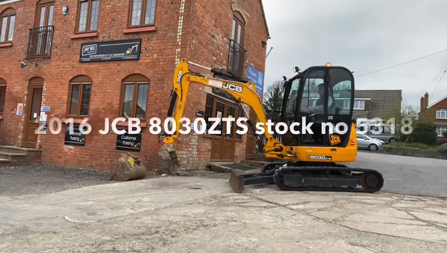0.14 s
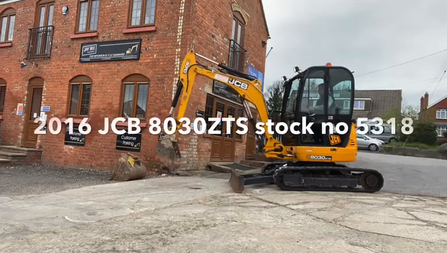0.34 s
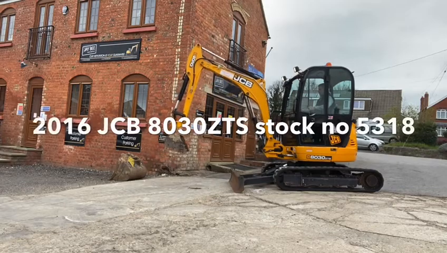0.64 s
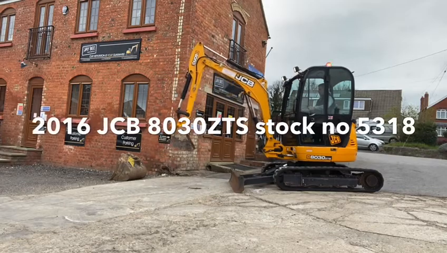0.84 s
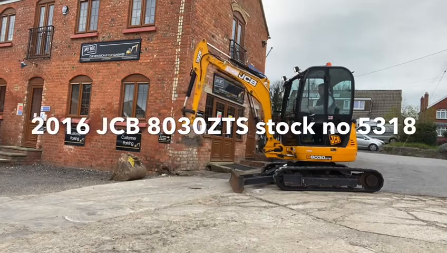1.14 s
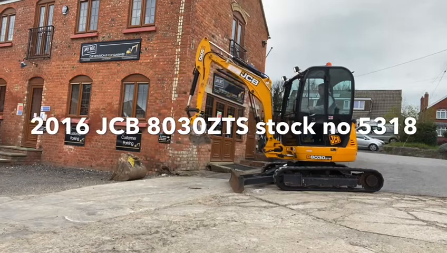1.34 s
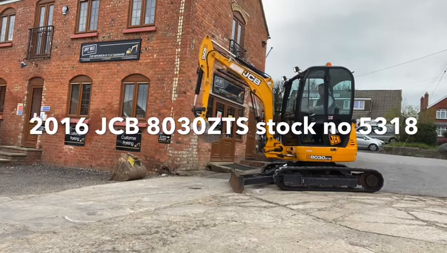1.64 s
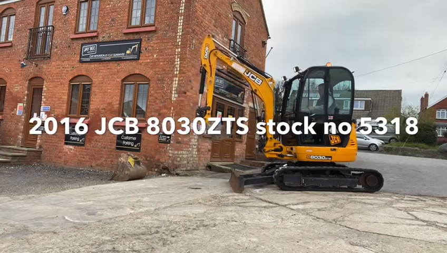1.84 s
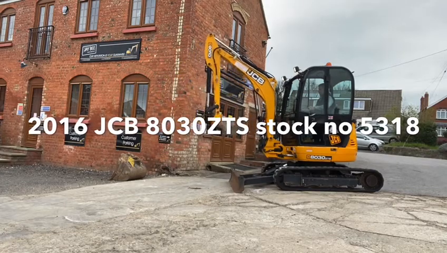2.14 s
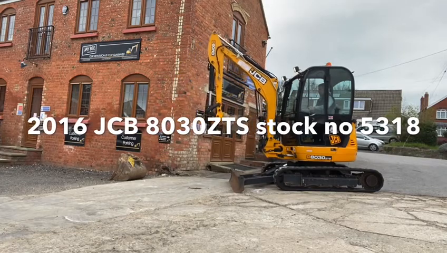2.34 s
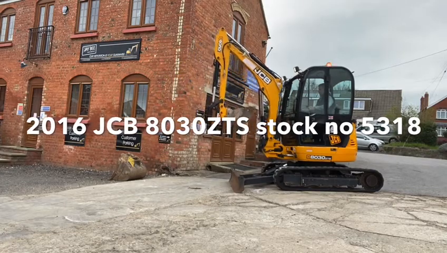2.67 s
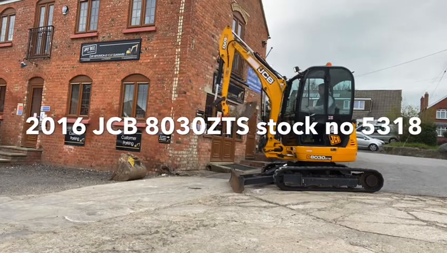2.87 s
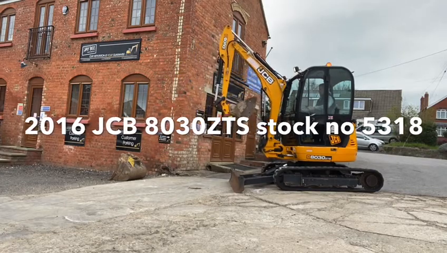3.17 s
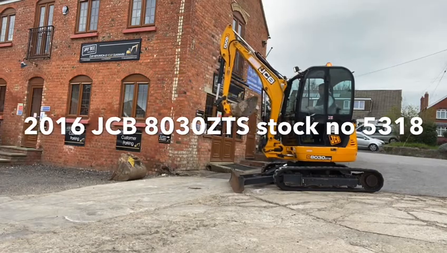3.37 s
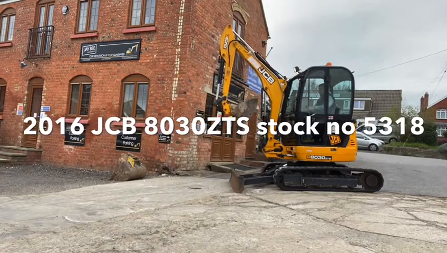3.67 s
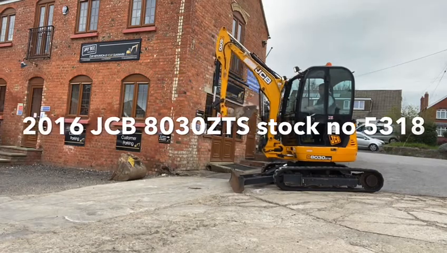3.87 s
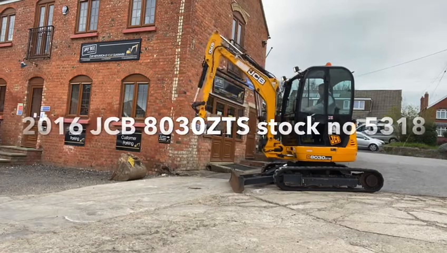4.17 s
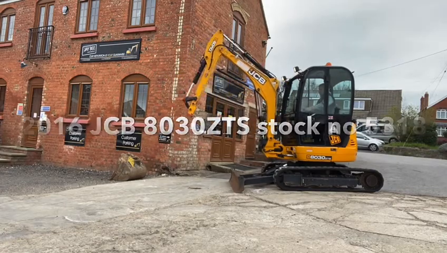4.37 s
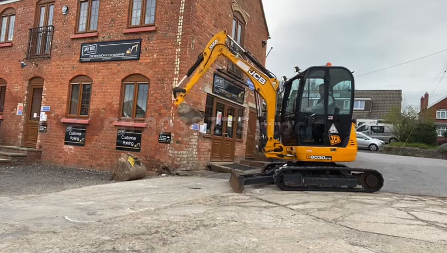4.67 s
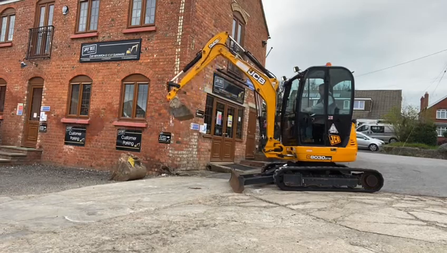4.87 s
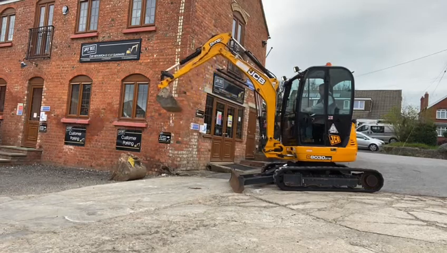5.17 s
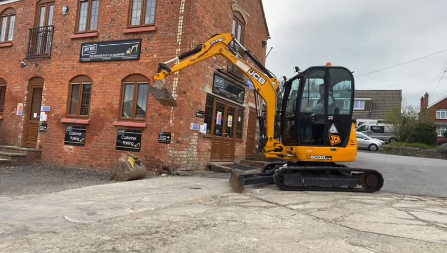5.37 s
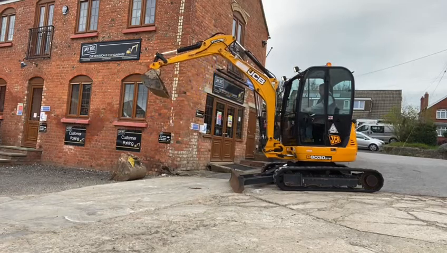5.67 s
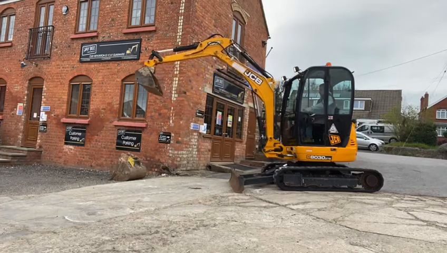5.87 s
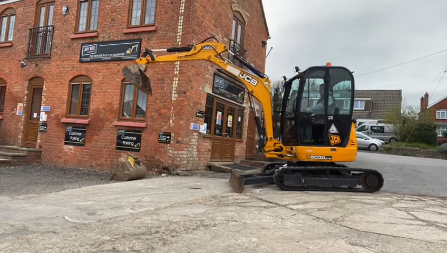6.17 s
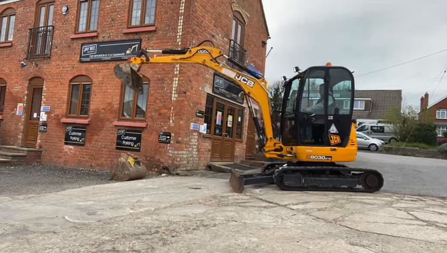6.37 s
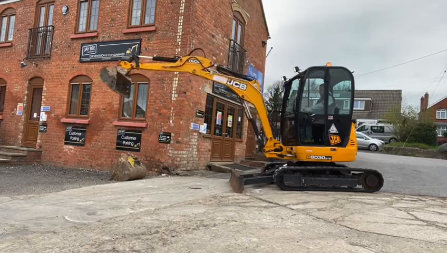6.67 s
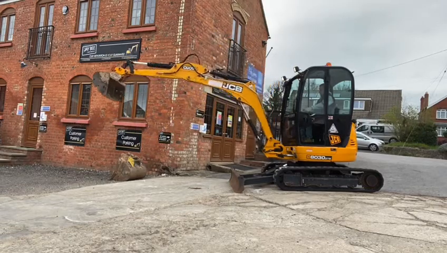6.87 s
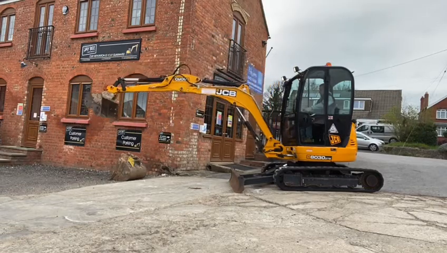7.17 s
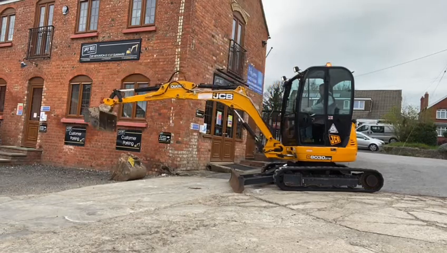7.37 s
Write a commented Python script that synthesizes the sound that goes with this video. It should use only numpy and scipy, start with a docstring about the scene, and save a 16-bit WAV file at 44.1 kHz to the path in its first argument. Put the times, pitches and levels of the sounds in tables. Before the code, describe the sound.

Close outdoor stereo sound of a compact digger working its arm in a paved yard. The low diesel drone never stops, dipping briefly under load, with gritty combustion clatter and thin whines. Steel joints knock softly at first, sharply a little later, then a breathy burst and one heavy thud with a bright crack. A few loose clanks trail off, and the engine continues with light ticks and faint hiss.

```python
"""In a paved yard beside a brick wall, a three-cylinder diesel mini excavator runs at a nearly steady speed.
The exhaust throbs as harmonics of the firing rate and barks through pipe resonances; the pump hums at the 8th.
Rumble, combustion clatter and oil hiss are coloured noises that swell with each firing.
The bucket linkage knocks as decaying modes and clanks when boom and arm change direction.
Thin whines are wavering sines; bursts of bright noise make a puff, then the crack of the big knock."""
import sys
import numpy as np
from scipy import signal
from scipy.fft import rfft, irfft
from scipy.io import wavfile
from scipy.ndimage import uniform_filter1d

SR = 44100
rng = np.random.default_rng(int(sys.argv[2]) if len(sys.argv) > 2 else 0)


def master(y):
    """Save y as 16-bit WAV."""
    cut = np.clip(np.atleast_2d(y).T, -1, 1)
    pcm = np.round(cut * 32767)  # scale
    wavfile.write(sys.argv[1], SR, pcm.astype(np.int16))


N = 331632

# Engine course; the firing tone rises with load:
# (time [s], firing rate [Hz], firing tone level [dB rms], second harmonic level [dB rms])
ENGINE = [(.0, 48.13, -21.5, -26), (.27, 47.23, -25, -23), (.45, 48.88, -24.5, -23),
          (.7, 49.43, -28, -26.5), (1.0, 48.57, -26, -26.5), (2.0, 48.52, -26, -26.5),
          (2.22, 48.19, -24, -22.5), (2.42, 45.65, -31, -48), (2.55, 47.16, -20.5, -24.5),
          (2.68, 48.58, -25.5, -20.5), (2.98, 47.27, -27, -22.5), (3.2, 49.7, -25, -25),
          (3.54, 50.6, -30, -22), (3.78, 49.65, -33, -24.5), (3.92, 49.9, -27, -23.5),
          (4.08, 47.52, -26, -26.5), (4.22, 49.9, -36, -24), (4.4, 48.78, -31.5, -25),
          (4.67, 48.95, -27, -26), (5.76, 48.12, -26.5, -23), (6.1, 48.07, -26.5, -23.5),
          (6.92, 46.95, -25.5, -22), (7.12, 48.83, -23.5, -22), (7.52, 48.5, -26, -27.5)]
# Higher harmonics of firing: (multiple [1], level at mean load [dB rms], share of load swing [1], waver [dB])
HARMONICS = [(3, -24, 0.37, 0.14), (4, -30, 0.64, 0.8), (5, -44, 0.25, 1.5), (7, -42, 0.33, 1.5),
             (12, -47, 0.27, 2.5)]
# Pump hum at the 8th multiple of the firing rate: (time [s], level [dB rms])
PUMP_HUM = [(0, -28.5), (.5, -33.5), (1.2, -33), (2.2, -31.5), (2.5, -31.5), (3.1, -31.5), (3.3, -41.5),
            (4.3, -36.5), (4.5, -34.5), (6.0, -30.5), (6.95, -30.5), (7.1, -33.5), (7.52, -32.5)]
# Weaker engine orders, most from unequal cylinders: (multiple of full cycle [1], level [dB rms])
UNEVEN_ORDERS = [(4, -46), (4.5, -42), (5, -43), (8, -40), (10, -36), (11, -44), (13, -37.5), (13.5, -44),
                 (14, -40.5), (15.5, -47), (16, -49), (17, -47), (18, -45), (19, -50), (20, -41.5),
                 (22, -46), (23, -46), (25, -53), (26, -53), (27, -43.5), (28, -49), (29, -53), (30, -55),
                 (33, -50), (34, -49), (37, -56), (39, -55), (40, -54), (45, -55), (48, -57), (50, -54)]
# Exhaust pipe resonances, before band limiting: (frequency [Hz], level [dB], t60 [s])
PIPE_MODES = [(220, -28.5, 0.06), (334, -40, 0.048)]
BARK_SPREAD_DB, BARK_JITTER_S = 5.5, 0.0008
# Colour of the engine body's rumble: (frequency [Hz], relative level [dB])
RUMBLE_COLOUR = [(25, -36), (60, 2.5), (130, 0), (220, 2), (300, -1), (420, -1.5), (520, -1.5), (650, -8.5),
                 (800, -7.5), (1100, -42)]
RUMBLE_DB, RUMBLE_DB_PER_HZ_SAG = -32, 0.94  # rumble grows as the engine is pulled below its mean speed
# Colour of the combustion clatter: (frequency [Hz], relative level [dB])
CLATTER_COLOUR = [(500, 7.5), (800, 5.5), (1200, 6), (1700, 2), (2500, 0.5), (3400, -3.5), (4100, 1),
                  (4700, -12), (6000, -11.5), (7000, -14), (8000, -12), (9300, -15), (10200, -16),
                  (11300, -21), (12200, -34)]
CLATTER_DB, CLATTER_LOAD_SHARE = -35, 0.26  # level at mean load; share of the load swing
# Knocks in the linkage:
# (time [s], strength [dB], centre of the modes struck [Hz], spread of the modes [octaves],
#  clank above ring [dB], free ringing [s])
KNOCKS = [(.32, -21, 378, 0.43, 0.5, 0.028), (.345, -28, 607, 0.88, 14, 0.057),
          (.365, -20, 490, 0.6, 11.5, 0.033), (.39, -25.5, 2090, 0.074, -15, 0.071),
          (.406, -20.5, 420.5, 0.39, 5, 0.028), (2.197, -22.5, 1469, 0.67, 17.5, 0.01),
          (2.205, -24, 431, 0.33, 5.5, 0.068), (2.233, -9, 740, 0.26, -2.5, 0.069),
          (2.24, -22, 440, 0.28, -9.5, 0.066), (2.236, -14, 2432, 0.5, 11, 0.08),
          (2.252, -11.5, 865, 0.36, 9.5, 0.042), (2.313, -11.5, 730, 0.71, 9.5, 0.056),
          (2.313, -18.5, 2780, 1.088, 10, .04), (2.318, -15, 430.5, .25, -7, 0.045),
          (2.32, -5.5, 207.3, 0.65, -15, 0.038), (2.335, -16.5, 1060, 0.13, -11, 0.19),
          (2.344, -14, 1960, 0.14, 1.5, 0.084), (2.378, -10.5, 890, 0.14, 3, 0.036),
          (2.41, -24.5, 1150, .5, 8, .07), (3.171, -30, 474.4, 1.6, -4, .05),
          (3.925, -28, 694, 0.29, 21.5, 0.052), (4.019, -19.5, 586, 0.4, 12, 0.063),
          (4.079, -10.5, 724, 0.21, 7, 0.016), (4.095, -7, 753, 0.3, 13.5, 0.1),
          (4.104, -18.5, 1791, 1.5, 7, 0.045), (4.107, -14, 6440, 1, -21, 0.059),
          (4.109, 3.5, 200, .3, -28, 0.014), (4.108, -4.5, 4900, .1, -20, 0.03),
          (4.172, -24, 5330, .1, -26, .02), (4.11, -6.5, 423, 0.12, -23.5, 0.1),
          (4.125, -26, 1300, 0.88, 12, 0.056), (4.215, -20, 775, 0.34, 8.5, 0.088),
          (4.325, -22.5, 850, 0.38, 8.5, 0.056), (4.346, -22.5, 860, 0.48, 13, 0.044),
          (4.38, -21, 737, 0.42, 10, 0.063), (4.4, -25, 2200, 0.098, -8, .03),
          (4.422, -15, 925, 0.055, 8, 0.095), (4.43, -36, 2143, .1, -4, .03),
          (4.447, -24, 1130, 0.14, 2, .05), (6.808, -25.5, 690, 0.24, 6.5, 0.027),
          (6.825, -26, 764, 0.1, 16.5, 0.022), (6.947, -15, 705, 0.095, 3, 0.014),
          (6.958, -17, 777, 0.14, 1, .035), (7.143, -21.5, 779.6, 0.13, 1, 0.026)]
# Modes of bucket and arm: (frequency [Hz], relative level [dB], undamped t60 [s])
STEEL_MODES = [(205, 0, .1), (380, -9, .12), (411, 1, 1.1), (462, -7, .18), (600, -8, .12), (707, -1, .5),
               (735, -3, .4), (785, -6, .2), (872, -3, .28), (918, -3, .35), (1044, -4, .9),
               (1125, -7, .25), (1207, -7, .25), (1324, -7, .25), (1430, -7, .25), (1620, -11, .15),
               (1809, -9, .25), (1868, -9, .22), (2146, -6, .3), (2229, -10, .2), (2476, -11, .2),
               (2665, -9, .25), (3100, -13, .15), (3800, -13, .12), (4097, -15, .12), (4900, -9, .12),
               (5383, -14, .2), (7833, -12, .12), (8161, -10, .1), (11100, -10, .1)]
MODE_SHARE_DB, CLANK_SHARE_DB = -5, -17  # what one mode and the clank take of a knock's strength
STRIKE_S, DAMPED_S, LINGER_DB = .008, .014, -13  # build-up; damping time constant; undamped remainder
RATTLE_DB, RATTLE_HZ = 2.0, 40  # loose parts make each mode flutter
# Colour of the clank: (frequency [Hz], relative level [dB])
CLANK_COLOUR = [(200, 10), (600, 9.0), (1000, 4.5), (2000, -6.0), (3500, -12.5), (4500, -10.0),
                (6000, -31.5), (12000, -14.0)]
# Oil valve openings: (opens fully [s], starts to shut [s], hiss level [dB])
VALVES = [(-.2, 0.092, -41), (2.487, 2.878, -36.5), (2.914, 3.24, -43.5), (6.09, 7.104, -45.5)]
OPEN_S, SHUT_S = 0.26, 0.035  # rise before full opening; closing time constant
# Colour of the oil hiss: (frequency [Hz], relative level [dB])
HISS_COLOUR = [(1500, -25), (2500, -7), (4200, 13), (5500, 12), (7500, 5.5), (9000, 9), (10300, -21.5),
               (11500, 32), (12200, -15)]
# Bursts of bright noise, a puff, then the crack of the big knock:
# (time [s], rise [s], hold [s], fall [s], level [dB])
BURSTS = [(3.863, 0.041, 0.018, 0.17, -30.5), (4.098, 0.0089, 0.004, 0.058, -46)]
# Colour of the bursts: (frequency [Hz], relative level [dB])
BURST_COLOUR = [(1200, 7.5), (2000, 22.5), (2800, 17), (4000, 11.5), (7000, 8.5), (12000, -28)]
# Thin whines of gears and valves: (start [s], end [s], frequency [Hz], level [dB rms])
WHINES = [(0, .6, 2452, -46), (.59, 1.44, 2457, -44.5), (1.43, 2.1, 2462, -47), (2.42, 2.66, 2468, -46),
          (.7, 2.2, 2125, -54), (2.88, 3.12, 1895, -48), (1.55, 2.2, 1460, -51), (0, 1.6, 730, -46),
          (5.8, 7.0, 1770, -54), (6.98, 7.56, 1790, -50), (7.1, 7.56, 1625, -50), (4.7, 7.1, 1120, -51),
          (6.0, 7.56, 815, -47)]
# Echoes from wall and houses: (delay [s], level [dB])
ECHOES = [(.021, -9), (.047, -11), (.083, -14)]
# Phase between the two ports: (frequency [Hz], lead of the left [rad])
LEAD = [(0, 0), (260, -.1), (600, 1.2), (1000, 0), (2300, -.3), (4900, -.95 * np.pi), (5500, -1.07 * np.pi),
        (7500, -2 * np.pi), (9600, -2.95 * np.pi), (10800, -3.05 * np.pi), (12500, -4 * np.pi)]
# Likeness of the two ports: (frequency [Hz], likeness 0 to 1 [1])
LIKENESS = [(40, 1), (100, 0.66), (200, 0.7), (500, 0.034), (1200, 0.2), (2500, 0.46), (4000, 0.75),
            (4700, 1), (12000, 1)]
# Level balance of the two ports: (frequency [Hz], left minus right [dB])
TILT = [(50, -1), (110, -6), (190, -3.5), (350, -2), (630, 2), (1130, 0.5), (2030, -0.5), (3660, -1),
        (4600, 0), (12000, 0)]
CUTOFF_HZ = 12400


def exhaust(turn, load_db, second_db):
    """Harmonic synthesis: phase-locked firing multiples, smeared by the pipe, plus orders of the full cycle."""
    out = np.zeros(N)
    swing_db = load_db - load_db.mean()
    levels = [(1, load_db + .4 * drift(9)), (2, second_db + 1.3 * drift(4))]
    for k, db, share, waver_db in HARMONICS:
        levels.append((round(k), db + share * swing_db + waver_db * drift(5.4)))
    levels.append((8, in_time(PUMP_HUM)[0] + .8 * drift(4.2)))
    for k, db in levels:
        smear = 3.8 + .65 * k * k  # phase quadratic in order spreads the pulse in time
        out += np.sqrt(2) * from_db(db) * np.cos(k * turn + smear + .08 * drift(6))
    for order, db in UNEVEN_ORDERS:
        amplitude = np.sqrt(2) * from_db(db + 1.5 * drift(2.5))
        wander = .25 * drift(1.7) + rng.uniform(0, 2 * np.pi)
        out += amplitude * np.cos(order * turn / 3 + wander)  # three firings per cycle
    return out


def bark(turn):
    """Impulse excitation of resonators: one click per firing, uneven in strength and time, rings the pipe."""
    fired = np.flatnonzero(np.diff(turn // (2 * np.pi)))
    luck = rng.standard_normal((len(fired), 2))
    at = np.clip(fired + (BARK_JITTER_S * SR * luck[:, 0]).astype(int), 0, N - 1)
    clicks = np.full(N, 1e-18)
    clicks[at] = from_db(BARK_SPREAD_DB * np.clip(luck[:, 1], -2, 2))
    out = np.zeros(N)
    for hz, db, t60 in PIPE_MODES:
        r = from_db(-60 / (t60 * SR))
        w = 2 * np.pi * hz / SR
        out += from_db(db) * signal.lfilter([0, np.sin(w)], [1, -2 * r * np.cos(w), r * r], clicks)
    return signal.sosfilt(signal.butter(3, [60, 400], "band", fs=SR, output="sos"), out)


def firing_gate(turn, depth, sharp):
    """Amplitude modulation: noise swells with each firing, each with a strength of its own."""
    firing = turn / (2 * np.pi)
    strength = from_db(rng.normal(0, 2.0, int(firing[-1]) + 2))[firing.astype(int)]
    return uniform_filter1d(1 + depth * strength * np.exp(-sharp * (firing % 1)), size=130)


def rumble(turn, hz):
    """Forced vibration of the engine body: low noise that grows as the speed sags."""
    db = RUMBLE_DB + RUMBLE_DB_PER_HZ_SAG * np.maximum(hz.mean() - hz, 0)
    return from_db(db) * coloured(RUMBLE_COLOUR, firing_gate(turn, depth=0.97, sharp=1.2))


def clatter(turn, load_db):
    """Combustion noise: a broad band gated by firing that follows part of the load swing."""
    db = CLATTER_DB + CLATTER_LOAD_SHARE * (load_db - load_db.mean())
    return from_db(db) * coloured(CLATTER_COLOUR, firing_gate(turn, depth=1.0, sharp=0.65))


def knocks():
    """Modal impact: modes near a centre ring until the pin seats and damps them, plus a dying noise clank."""
    hz, db, t60 = np.array(STEEL_MODES).T[:, :, None]
    t = np.arange(SR // 2) / SR
    luck = rng.standard_normal((len(KNOCKS), len(STEEL_MODES), 1))
    phase = rng.uniform(0, 2 * np.pi, luck.shape)
    flutter = RATTLE_DB * np.pad([drift(RATTLE_HZ) for _ in STEEL_MODES], ((0, 0), (0, len(t))))
    ring, clicks = np.zeros(N + len(t)), np.zeros(N)
    for k, (s, strength_db, centre_hz, spread, clank_db, free) in enumerate(KNOCKS):
        at = round(s * SR)
        near_db = -6 * (np.log2(hz / centre_hz) / spread) ** 2
        mode_db = strength_db + db + MODE_SHARE_DB + near_db + 2.7 * luck[k]
        mode_db = mode_db + flutter[:, at:at + len(t)] - 60 * t / t60
        modes = from_db(mode_db) * np.sin(2 * np.pi * hz * t + phase[k])
        damping = np.maximum(np.exp(-np.maximum(t - free, 0) / DAMPED_S), from_db(LINGER_DB))
        ring[at:at + len(t)] += modes.sum(axis=0) * np.minimum(t / STRIKE_S, 1) * damping
        clicks[at] += from_db(strength_db + clank_db + CLANK_SHARE_DB)
    dying = signal.lfilter([1], [1, -from_db(-60 / (.22 * SR))], clicks + 1e-18)  # t60 0.22 s
    dying = signal.lfilter([.01], [1, -.99], dying)  # the clank builds over a few ms
    return ring[:N], dying * coloured(CLANK_COLOUR, 1)


def oil_hiss(turn):
    """Turbulent flow noise: each valve opening swells, holds and dies away."""
    t = np.arange(N) / SR
    flow = np.zeros(N)
    for opened, end, db in VALVES:
        swell = np.clip((t - opened) / OPEN_S + 1, 0, 1) ** 2
        flow += from_db(db) * swell * np.exp(-np.maximum(t - end, 0) / SHUT_S)
    return flow * from_db(1.2 * drift(5)) * coloured(HISS_COLOUR, firing_gate(turn, depth=.3, sharp=5.0))


def bursts():
    """Noise bursts: bright broad noise rises quickly, holds, dies away exponentially."""
    t, shape = np.arange(N) / SR, np.zeros(N)
    for s, rise, hold, fall, db in BURSTS:
        swell = np.clip((t - s) / rise, 0, 1) ** 2
        shape += from_db(db) * swell * np.exp(-np.maximum(t - s - rise - hold, 0) / fall)
    return shape * coloured(BURST_COLOUR, 1)


def whines():
    """Narrow-band tones: sines slightly wavering in level and phase that fade in and out."""
    t, out = np.arange(N) / SR, np.zeros(N)
    for start, end, hz, db in WHINES:
        fade = np.clip(np.minimum(t - start, end - t) / 0.011, 0, 1)
        amplitude = np.sqrt(2) * from_db(db + 2.0 * drift(12))
        out += fade * amplitude * np.sin(2 * np.pi * hz * t + .9 * drift(12))
    return out


def scattered(x):
    """Reflection: walls return a few delayed, weaker copies; the direct part is left out."""
    out = np.zeros(N)
    for s, db in ECHOES:
        lag = round(s * SR)
        out[lag:] += from_db(db) * x[:-lag]
    return out


def coloured(spectrum, gate):
    """Spectral shaping: two unrelated gated noises of one colour, each of rms 1."""
    white = gate * rng.standard_normal((2, N))
    return rms_one(irfft(rfft(white) * from_db(at_hz(spectrum)), N))


def drift(rate):
    """Low-pass random fluctuation: slow chance of rms 1, with its corner near rate [Hz]."""
    r = np.exp(-80 * np.pi * rate / SR)  # computed at every 40th sample
    slow = signal.lfilter([1], [1, -2 * r, r * r], rng.standard_normal(N // 40 + 2002))[2000:]
    return np.interp(np.arange(N) / 40, np.arange(len(slow)), rms_one(slow))


def from_db(db):
    """Decibel law: the amplitude ratio of a level."""
    return 10 ** (np.asarray(db) / 20)


def rms_one(x):
    """Normalization of power: scale to rms 1."""
    return x / np.sqrt(np.mean(x ** 2, axis=-1, keepdims=True) + 1e-20)


def in_time(rows):
    """Linear interpolation: the columns of a table at every sample."""
    s, *columns = np.transpose(rows)
    return [np.interp(np.arange(N) / SR, s, c) for c in columns]


def at_hz(points, log=True):
    """Interpolation over frequency: a table read at every FFT bin."""
    hz, value = np.transpose(points)
    bins = np.arange(N // 2 + 1) * SR / N
    if log:
        return np.interp(np.log(bins + 1), np.log(hz + 1), value)
    return np.interp(bins, hz, value)


def scene():
    """Two-port coherence: direct and scattered parts mix into two ports a little apart."""
    hz, load_db, second_db = in_time(ENGINE)
    turn = 2 * np.pi * np.cumsum(hz) / SR  # one revolution of phase per firing
    ring, clank = knocks()
    ring = ring + .4 * scattered(ring)
    tones = exhaust(turn, load_db, second_db) + bark(turn) + whines() + ring
    tones = tones * signal.windows.tukey(N, .001)  # soft ends
    noise = rumble(turn, hz) + clatter(turn, load_db) + oil_hiss(turn) + clank
    direct, diffuse = rfft(noise + [tones, 0.097 * scattered(tones)])
    alike = np.clip(at_hz(LIKENESS), 0, 1)
    side = np.array([[1], [-1]])  # left, right
    ports = (np.sqrt(1 + alike) * direct + side * np.sqrt(1 - alike) * diffuse) / np.sqrt(2)
    ports = ports * from_db(side * at_hz(TILT) / 2) * np.exp(.5j * side * at_hz(LEAD, log=False))
    return irfft(ports, N) + bursts()  # the bursts reach each port as unrelated noise


def record(dry):
    """Saturation and band limiting: peaks are rounded, the top is cut."""
    rounded = 1.2 * np.tanh(dry / 1.2)
    return signal.sosfilt(signal.cheby2(12, 70, CUTOFF_HZ, fs=SR, output="sos"), rounded)


dry = scene()
out = record(dry)
master(out)
```